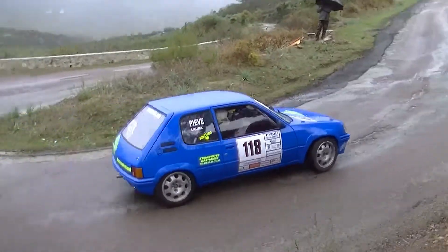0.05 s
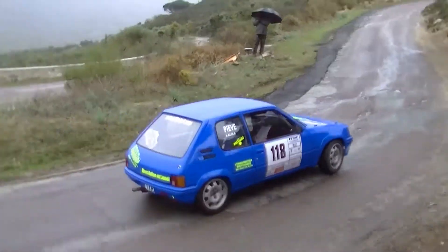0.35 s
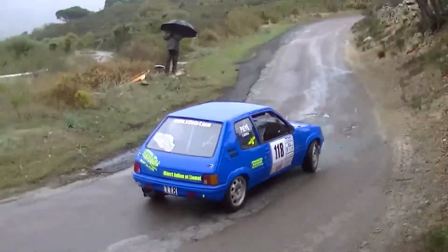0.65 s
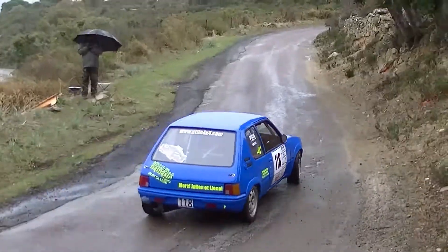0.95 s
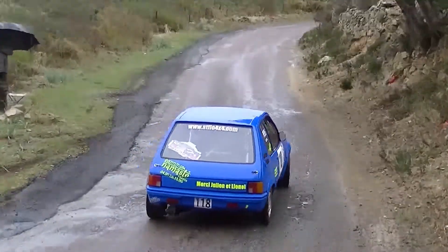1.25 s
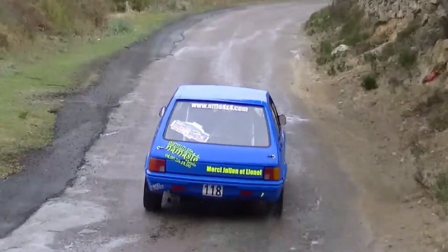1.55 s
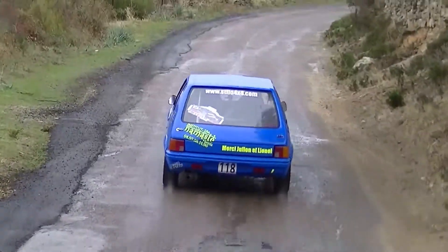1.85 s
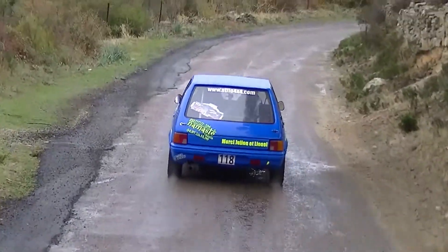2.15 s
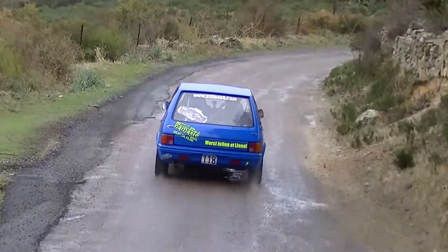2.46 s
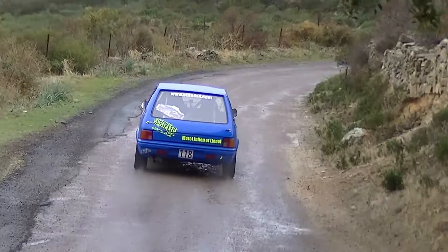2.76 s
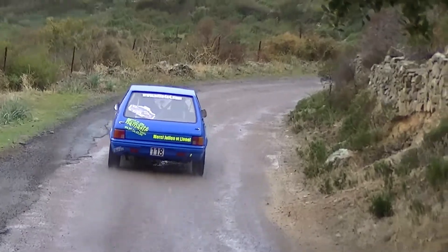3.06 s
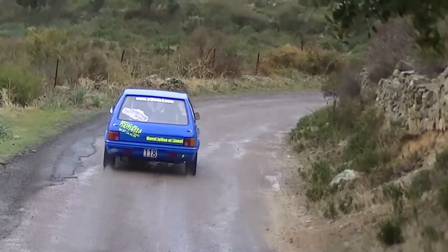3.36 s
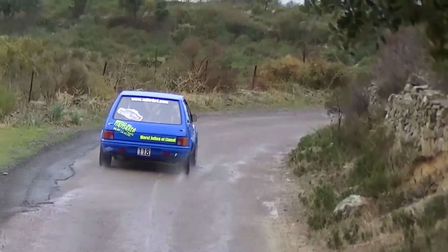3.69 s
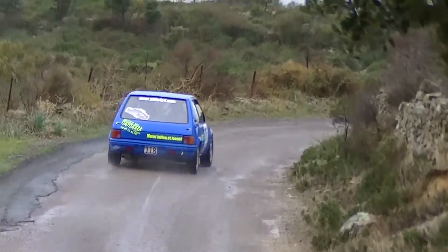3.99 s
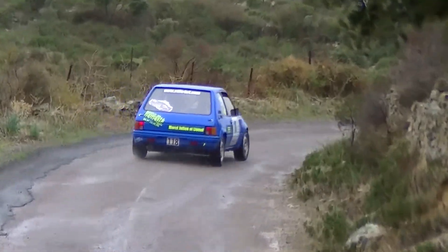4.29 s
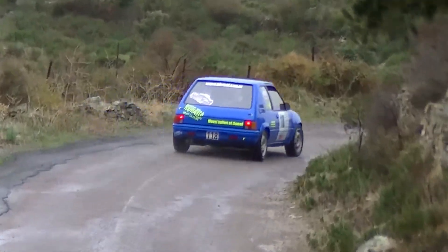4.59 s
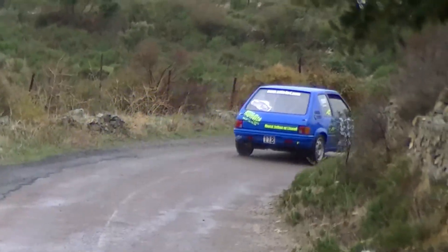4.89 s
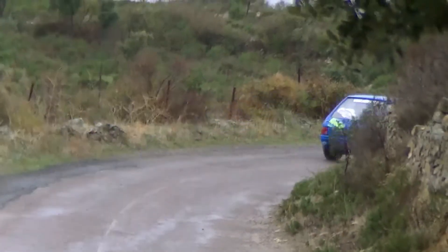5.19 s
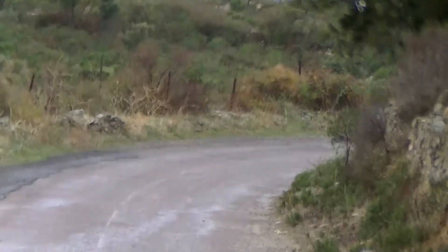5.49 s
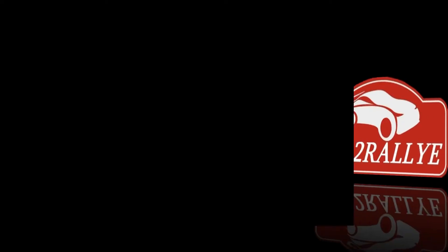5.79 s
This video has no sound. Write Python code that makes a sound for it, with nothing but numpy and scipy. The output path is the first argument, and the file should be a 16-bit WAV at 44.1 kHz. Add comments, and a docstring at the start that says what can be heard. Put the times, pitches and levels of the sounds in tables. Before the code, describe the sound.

From the roadside, a tyre chirps for an instant and a rally car revs up out of a tight bend, its exhaust barking and rasping over a light hiss of wet tyres. It changes up with a backfire pop, pulls briefly, then eases off with a blip and small spits before accelerating again. Grit clicks, a bank echoes slightly and faint wind rumbles. The car begins to dull, close dry ticks follow, and everything cuts off.

```python
"""A four-cylinder rally car pulls out of a hairpin and away up a wet tarmac road; microphone on the verge.
It revs up, changes gear with a pop, lifts and picks up again; uneven firings boom, bark and rasp in
the exhaust. Tyres hiss, chirp once and flick grit; the bank echoes a little, then hides the car.
A faint breeze is on the microphone. Sharp ticks come close by just before the sound stops dead."""
import sys
import numpy as np
from scipy import signal
from scipy.fft import rfft, irfft
from scipy.io import wavfile
from scipy.ndimage import uniform_filter1d, map_coordinates

SR = 44100
rng = np.random.default_rng(int(sys.argv[2]) if len(sys.argv) > 2 else 0)


def unload_audio(sound):
    """Save the sound as a 16-bit wav file, at the path given as the first command line argument."""
    columns = np.transpose(np.atleast_2d(sound))
    # keep every value between -1 and 1, then stretch to whole-number steps
    steps = np.round(np.clip(columns, -1, 1) * 32767)
    wavfile.write(sys.argv[1], SR, steps.astype(np.int16))


N = 266364
TIME = np.arange(N) / SR
MID_REVS_HZ = 160  # firing rate
STARVE_S = 0.053  # time the note takes to die on a lift
HIDDEN_S = 5.03  # the car starts to go behind the bank

# sudden lifts of the throttle: time_s, depth_db, recover_s, coasting_bark_db
LIFTS = [(2.817, -16.5, 0.06, 1.5), (4.208, -13, .12, 1.5)]
# the four lowest partials, fundamental first: load_db, coasting_db, revs_db_per_octave
PARTIALS = [(1, -1.5, 1), (0.5, -6, 2.5), (-3.5, -3, -5.5), (-5, -3.5, 1)]


def undb(db):
    """Decibels to gain."""
    return 10 ** (np.asarray(db) / 20)


def curves(table):
    """Each column of a timed table, sample by sample."""
    times, *columns = np.transpose(table)
    return [np.interp(TIME, times, column) for column in columns]


def unit(x):
    """Scale to rms 1."""
    return x / np.sqrt(np.mean(x ** 2))


def steady(x):
    """Scale to rms 1 over every quarter second."""
    return x / np.sqrt(uniform_filter1d(x ** 2, size=SR // 4) + 1e-18)


def noise():
    """White noise."""
    return rng.standard_normal(N)


def walk(rate_hz):
    """A smooth random drift of rms 1 that changes about rate_hz times a second."""
    knots = rng.standard_normal(4096)
    return unit(map_coordinates(knots, [TIME * rate_hz], order=3, mode="wrap"))


def colour(x, outline, size=4096):
    """Causal filter with an outline of freq_hz, level_db; keeps the power of white noise."""
    hz, db = np.transpose(outline)
    grid = np.maximum(np.fft.rfftfreq(size, 1 / SR), 1)
    gain = undb(np.interp(np.log(grid), np.log(hz), db))
    cepstrum = irfft(np.log(gain))
    cepstrum[1:size // 2] *= 2  # fold to minimum phase
    cepstrum[size // 2 + 1:] = 0
    response = irfft(np.exp(rfft(cepstrum)))
    return signal.fftconvolve(x, response / np.linalg.norm(response))[:N]


def resonate(x, hz, width_hz):
    """One resonance, gain 1 at its centre."""
    return signal.lfilter(*signal.iirpeak(hz, hz / width_hz, fs=SR), x)


def noise_band(hz, width_hz):
    """Noise passed twice through one resonance, rms 1."""
    return unit(resonate(resonate(noise(), hz, width_hz), hz, width_hz))


def delayed(x, delay_s):
    """The same sound, later."""
    return np.interp(TIME - delay_s, TIME, x, left=0)


def fade(start_s, t60_s):
    """A sudden rise that dies by 60 dB in t60_s."""
    age = TIME - start_s
    return (age >= 0) * np.exp(-np.log(1000) * np.clip(age / t60_s, 0, 4))


def ramp(start_s, length_s):
    """A straight rise from 0 to 1."""
    return np.clip((TIME - start_s) / length_s, 0, 1)


def held(start_s, end_s, edge_s):
    """1 between start and end, with sloping edges centred on both."""
    return ramp(start_s - edge_s / 2, edge_s) - ramp(end_s - edge_s / 2, edge_s)


def throttle(pedal_s=0.026):
    """How far the throttle is open (0-1), then the dB it adds to boom, overtones, bark and rasp."""
    # presses of the pedal: start_s, length_s, boom_db, overtones_db, bark_db, rasp_db
    pulls = [(0, 2.9, -0.5, -1.5, 3, 7), (3.119, 1.065, -2.3, 2, 3.5, 10.5), (4.383, .07, -6, 8.5, 8, 11.5),
             (5.114, .5, 0, -1.5, 6.5, 13.5)]
    return sum(np.outer([1, *boosts_db], held(start, start + length, pedal_s))
               for start, length, *boosts_db in pulls)


def firings(cycles, scatter_db, jitter):
    """One click a firing; each cylinder has its own strength and lateness, and no two are alike."""
    # cylinders in firing order: strength_db, lateness_periods
    cylinders = [(2.4, 0), (-1.5, .02), (-1.2, -.005), (-1, -.012)]
    count = np.arange(1, int(cycles[-1]))
    strength_db, late = np.array(cylinders)[count % len(cylinders)].T
    time_chance, size_chance = rng.standard_normal((len(count), 2)).T
    at = np.interp(count + late - late.mean() + jitter * time_chance, cycles, np.arange(N))
    size = undb(strength_db + scatter_db * size_chance)
    size = size / size.mean()
    whole, part = at.astype(int), at % 1  # each click is shared between two samples
    clicks = np.bincount(whole, size * (1 - part), N + 1) + np.bincount(whole + 1, size * part, N + 1)
    return clicks[:N]


def boom(cycles, hz, lag_periods=0.305, skew_rad=0.079, flutter_db=0.91, cool_tuning=0.889):
    """The smooth swell of gas that leaves the tailpipe just after each firing's sharp front."""
    # the hot pipe lifts or swallows each partial that sweeps through it: freq_hz, level_db
    pipe_response = [(90, -28), (112, -22.5), (133, -27), (146, -21.5), (205, -21), (235, -17),
                     (265, -23.5), (325, -21.5), (352, -25), (378, -20), (425, -22), (480, -23.5),
                     (550, -30.5), (615, -35), (655, -24.5), (820, -30.5)]
    pipe_hz, pipe_db = np.transpose(pipe_response)
    load, boom_db, overtones_db, _, _ = throttle()
    low_dip_db, high_dip_db = starvation()
    upper_db = high_dip_db + overtones_db + 0.45 * bank_shadow()
    tuning = load + (1 - load) * cool_tuning  # coasting, cooler gas lowers the resonances
    octaves = np.log2(hz / MID_REVS_HZ)
    swell = 0
    for k, (load_db, coasting_db, db_per_octave) in enumerate(PARTIALS, 1):
        response_db = np.interp(np.log(k * hz / tuning), np.log(pipe_hz), pipe_db)
        drive_db = load * load_db + (1 - load) * coasting_db + db_per_octave * octaves + boom_db
        level_db = response_db + drive_db + (low_dip_db if k == 1 else upper_db)
        partial = np.cos(2 * np.pi * k * (cycles - lag_periods) + skew_rad)
        swell = swell + undb(level_db + flutter_db * walk(60)) * partial
    return np.sqrt(2) * swell


def exhaust_levels(hz, bark_db_per_octave=-10, bark_beaming=0.44):
    """The dB of bark and rasp: both follow the throttle and are beamed out of the tailpipe."""
    # how squarely the tailpipe points at the microphone as the car swings round: time_s, level_db
    tailpipe_aim = [(0, -28.5), (1.0, -11.5), (1.22, -1.5), (1.42, 3.5), (1.65, 2.5), (1.9, -6), (2.25, -5),
                    (2.55, 0), (3.3, -5)]
    aim_db = curves(tailpipe_aim)[0]
    load, _, _, bark_push_db, rasp_push_db = throttle()
    coasting_db = 0
    for lift_s, _, _, db in LIFTS:
        coasting_db = np.where(TIME > lift_s - STARVE_S, db, coasting_db)
    revs_db = bark_db_per_octave * np.log2(hz / MID_REVS_HZ)
    loss_db = starvation()[1] + bank_shadow()
    bark_db = -33 + bark_push_db + (1 - load) * coasting_db + revs_db + bark_beaming * aim_db
    rasp_db = -42.5 + rasp_push_db + aim_db
    return bark_db + loss_db, rasp_db + loss_db


def exhaust(cycles, hz):
    """Sharp fronts ring the pipe: a throaty bark, and a rasp that opens under load."""
    # the pipe's throaty range: freq_hz, level_db
    bark_colour = [(35, -46), (60, -25), (85, 7.5), (130, 7.5), (230, 19.5), (400, 17), (480, 6.5),
                   (555, 12), (620, 4), (700, 7), (755, 10.5), (810, 11.5), (860, 4), (920, 1.5),
                   (1050, -4), (1400, -6), (4000, -72.5), (16000, -83)]
    # the pipe's rasping upper range: freq_hz, level_db
    rasp_colour = [(600, -25), (950, -6), (1150, -1), (1380, 0), (1540, -1), (1720, -2), (1880, -4),
                   (2080, -6), (2300, -20), (2500, -21), (2800, -16), (4000, -26), (8000, -48),
                   (16000, -75)]
    bark_db, rasp_db = exhaust_levels(hz)
    fronts = firings(cycles, scatter_db=.8, jitter=.003)
    # the lowest four partials belong to the boom; the limp between them stays
    low_partials = sum(np.cos(2 * np.pi * k * cycles) for k in range(1, len(PARTIALS) + 1))
    edges = fronts - hz / SR * (1 + 2 * low_partials)
    # each front drags a short puff of turbulence behind it
    puffs = undb(-13) * unit(np.exp(-(cycles % 1) / .3) * noise())
    bark = colour(-edges, bark_colour)
    rasp = silencer(colour(puffs - unit(edges), rasp_colour))
    return steady(bark) * undb(bark_db) + steady(rasp) * undb(rasp_db)


def silencer(x):
    """The can rings on between firings and lends the rasp a nasal edge."""
    # modes of the can: freq_hz, width_hz, level_db
    modes = [(1390, 80, 10.5), (1495, 220, 2), (1676, 55, 1)]
    return x + sum(undb(db) * resonate(x, hz, width) for hz, width, db in modes)


def bass_cut(x, cutoff_hz=62):
    """The exhaust's fronts carry almost no deep bass."""
    return signal.sosfilt(signal.butter(4, cutoff_hz, "highpass", fs=SR, output="sos"), x)


def gas_rush(cycles, hz, db_per_octave=3, away_s=0.58, hide_db_per_s=-9):
    """Gas and valve gear hiss in time with the firings, louder with revs and under braking."""
    # spectrum of the rush: freq_hz, level_db
    gas_colour = [(60, -22), (200, 8.5), (500, 10.5), (1000, 8), (1700, 1.5), (2050, 2), (2300, -2),
                  (2750, -1), (3500, -5.5), (4500, -11.5), (5000, -18), (7000, -21), (11000, -42),
                  (16000, -47)]
    pulsing = 1 + 0.052 * np.cos(2 * np.pi * (cycles - .15))
    gas = unit(colour(pulsing * noise() * undb(walk(45)), gas_colour))
    distance_db = -34.5 + 9.5 * np.exp(-TIME / away_s)  # closest in the hairpin
    flow_db = db_per_octave * np.log2(hz / MID_REVS_HZ) + .15 * starvation()[1] + 5.5 * braking()
    hidden_db = hide_db_per_s * np.maximum(TIME - HIDDEN_S, 0)
    return gas * undb(distance_db + flow_db + hidden_db)


def tyre_spray(away_s=0.72, braking_db=1, hidden_db=-10.5):
    """Tyres throw fine droplets off the wet road; their treble is the first thing the bank hides."""
    # spectrum of the spray: freq_hz, level_db
    spray_colour = [(2500, -28), (4500, 5.5), (5200, -5.5), (5600, 0), (5950, -3.5), (6400, 1),
                    (7000, -0.5), (8000, -1), (8500, -3.5), (9300, -3), (10300, -4), (11300, -9),
                    (12500, -13.5), (15500, -22.5)]
    droplets = noise() * undb(3.5 * np.clip(noise(), -3, 2.5))
    spray = unit(colour(droplets * undb(walk(31)), spray_colour))
    distance_db = -56 + 15 * np.exp(-TIME / away_s)
    return spray * undb(distance_db + braking_db * braking() + hidden_db * ramp(HIDDEN_S, 0.15))


def engine_bay(cycles):
    """Valve gear knocks once a firing and rings the metal round it; loudest with the car side-on."""
    # stiff panels under the bonnet: freq_hz, width_hz, level_db
    panels = [(2070, 130, 0), (2760, 260, -5), (3500, 350, -5)]
    # how much of the bay faces the microphone: time_s, level_db
    facing = [(0, -41), (.35, -42.5), (.6, -45.5), (.9, -55.5), (1.3, -48), (1.8, -74.5), (4.2, -48),
              (4.6, -58), (4.95, -43), (5.15, -76), (5.58, -68)]
    knocks = firings(cycles, scatter_db=2.2, jitter=.02)
    ring = sum(undb(db) * resonate(resonate(knocks, hz, width), hz, 3 * width)
               for hz, width, db in panels)
    return steady(ring) * undb(curves(facing)[0])


def breeze(gust_db=3):
    """Light wind rumbles on the microphone."""
    # spectrum of the rumble: freq_hz, level_db
    wind_colour = [(20, 0), (60, -2), (120, -7), (300, -22), (1000, -45), (8000, -90)]
    # strength of the breeze: time_s, level_db
    strength = [(0, -56), (.6, -62), (1.5, -61), (3.6, -62), (5.2, -48.5)]
    return unit(colour(noise(), wind_colour)) * undb(curves(strength)[0] + gust_db * walk(3.9))


def hillside(x, scatter_db, t60_s=0.17):
    """A few echoes, then a thin scatter off rocks and scrub, different in each channel."""
    # echoes from the road and the bank: delay_s, level_db
    reflections = [(0.0117, -15.5), (0.0248, -12.5), (.041, -29.5)]
    echoes = sum(undb(db) * delayed(x, delay) for delay, db in reflections)
    tails = rng.standard_normal((2, SR // 2)) * fade(0.011, t60_s)[:SR // 2]
    tails /= np.linalg.norm(tails, axis=1, keepdims=True)
    scatter = signal.fftconvolve(x[None], tails, axes=1)[:, :N]
    return x + echoes + undb(scatter_db) * scatter


def tyre_chirp():
    """A tyre slips for an instant in the hairpin; the squeal wavers."""
    # the slip: centre_s, pitch_hz, level_db, half_length_s
    slips = [(.068, 1050, -17, .004)]
    waver = .4 * walk(500)
    return sum(undb(db) * np.exp(-((TIME - centre) / half) ** 2) * np.sin(2 * np.pi * hz * TIME + waver)
               for centre, hz, db, half in slips)


def chink():
    """A stone that meets bare metal gives a short, very high ring."""
    # the strike: start_s, level_db, ring_hz, width_hz, t60_s
    strikes = [(1.1, -31.5, 10060, 2200, 0.032)]
    return sum(undb(db) * fade(start, t60) * noise_band(hz, width)
               for start, db, hz, width, t60 in strikes)


def grit(trim_db=-3, crack_db=6, crack_t60_s=0.006):
    """Stones crack against the underbody and ring briefly."""
    # stones flicked by the tyres: start_s, relative_db, ring_t60_s
    stones = [(1.102, -30, 0.064), (2.858, -43, 0.014), (3.052, -39, .018), (3.628, -44, 0.015),
              (4.234, -40, .02), (4.265, -44.5, .02), (4.422, -41, .02), (4.5806, -38, .02),
              (4.6454, -36, 0.019), (4.777, -35, 0.016), (4.834, -35, 0.017), (4.919, -38.5, .02),
              (4.9481, -37, .02), (5.0344, -44, 0.021)]
    # spectrum of the hits: freq_hz, level_db
    grit_colour = [(500, -27), (1500, -31), (3500, 4.5), (5000, -11.5), (6500, -1.5), (8500, -13),
                   (10300, -12), (12500, -25.5), (16000, -20.5)]
    envelope = sum(undb(db) * (fade(start, t60) + undb(crack_db) * fade(start, crack_t60_s))
                   for start, db, t60 in stones)
    return undb(trim_db) * colour(envelope * noise(), grit_colour)


def starvation(refill_s=0.017):
    """A lift starves the exhaust: the dB lost briefly by the fundamental, and for longer above it."""
    low_db = high_db = 0
    for lift_s, depth_db, recover_s, _ in LIFTS:
        dip_db = depth_db * ramp(lift_s - STARVE_S, STARVE_S)
        age = np.maximum(TIME - lift_s, 0)
        low_db = low_db + dip_db * np.exp(-(age / refill_s) ** 2)
        high_db = high_db + dip_db * np.exp(-(age / recover_s) ** 2)
    return low_db, high_db


def spits(rise_s=0.02):
    """Unburnt fuel goes off in the pipe as breathy spits of gas."""
    # spits from the tailpipe: start_s, relative_db, centre_hz, width_hz, t60_s
    bursts = [(2.916, -31, 1500, 900, .03), (3.094, -16, 480, 550, .07), (4.384, -22, 2700, 2600, .13),
              (4.833, -21, 1900, 1500, .03), (4.947, -19.5, 1600, 2500, .028),
              (5.096, -15.5, 740, 250, .09)]
    return sum(undb(db) * (fade(start, t60) - fade(start, rise_s)) * noise_band(hz, width)
               for start, db, hz, width, t60 in bursts)


def backfires():
    """Unburnt fuel goes off as the throttle comes back; each hard front rings the pipe."""
    # the pipe's answer to a single blow: freq_hz, level_db
    bang_colour = [(40, -20), (100, 0), (300, 2), (550, 0), (900, -6), (1400, -7), (1800, -11), (2400, -32),
                   (8000, -70)]
    # bangs at the gear change: start_s, level_db
    bangs = [(3.0958, -5.5), (3.1078, -14)]
    ring = colour(-signal.unit_impulse(N), bang_colour)
    ring /= np.abs(ring).max()
    return sum(undb(db) * delayed(ring, start) for start, db in bangs)


def braking():
    """1 while the car brakes for the bend and the wheels drive the engine."""
    return held(start_s=4.16, end_s=4.98, edge_s=0.17)


def bank_shadow(after_s=0.21, db_per_s=-29):
    """The dB that the bank takes from the exhaust's upper range; the tailpipe is hidden last."""
    return db_per_s * np.maximum(TIME - HIDDEN_S - after_s, 0)


def close_ticks(t60_s=0.012):
    """Dry, bright ticks close to the microphone."""
    # the ticks: start_s, level_db
    ticks = [(5.3738, -36), (5.3975, -34), (5.4199, -31), (5.4252, -28), (5.4381, -38), (5.456, -25.5),
             (5.4646, -29), (5.4967, -31), (5.5039, -23.5), (5.5327, -23.5), (5.5366, -23), (5.56, -20),
             (5.5786, -23)]
    # spectrum of a tick: freq_hz, level_db
    tick_colour = [(1000, 3.5), (3000, -3.5), (6000, -12), (10000, -11), (13000, -21), (16000, -34)]
    envelope = sum(undb(db) * fade(start, t60_s) for start, db in ticks)
    return colour(envelope * noise(), tick_colour)


def scene(pipe_right_db=2.5):
    """From the verge the exhaust sits a little to the right, the hiss in the middle."""
    # a long pull in first, an upshift, a short pull, a downshift, a pick-up: time_s, firing_hz
    engine_speed = [(0.0, 109.6), (0.14, 90.2), (0.3, 90.9), (0.42, 97.82), (1.05, 123.2), (1.22, 133.3),
                    (1.74, 157.1), (2.3, 185.5), (2.76, 206.4), (2.9, 187.1), (3.1, 168.3), (3.14, 186.4),
                    (3.2, 186), (3.28, 160.1), (3.39, 152.8), (3.48, 162), (3.6, 161.8), (4.14, 175.8),
                    (4.3, 158.4), (4.41, 176.8), (4.57, 162.2), (4.69, 165.9), (4.83, 156), (4.92, 161.4),
                    (5.09, 155.6), (5.16, 174.5), (5.25, 168), (5.32, 175.4), (5.55, 166.2)]
    hz = curves(engine_speed)[0] * (1 + .0007 * walk(20))
    cycles = np.cumsum(hz) / SR  # one cycle a firing
    pan = undb(np.array([[-pipe_right_db], [pipe_right_db]]) / 2)
    swell = boom(cycles, hz)
    fronts = bass_cut(exhaust(cycles, hz) + spits() + backfires())
    pipe = swell + hillside(fronts + tyre_chirp(), scatter_db=-19)
    hiss = hillside(gas_rush(cycles, hz) + tyre_spray() + engine_bay(cycles), scatter_db=-13)
    return pan * pipe + hiss + breeze() + grit() + close_ticks() + chink()


def record(dry, stop_s=5.583, top_hz=15800):
    """The sound stops dead; the highest treble is cut."""
    running = np.clip((stop_s - TIME) / .002, 0, 1)
    return signal.sosfilt(signal.ellip(8, .2, 70, top_hz, fs=SR, output="sos"), dry * running)


dry = scene()
out = record(dry)
unload_audio(out)
```